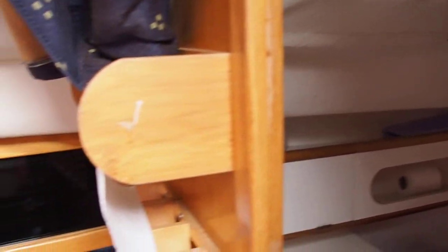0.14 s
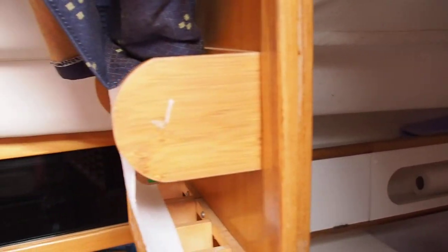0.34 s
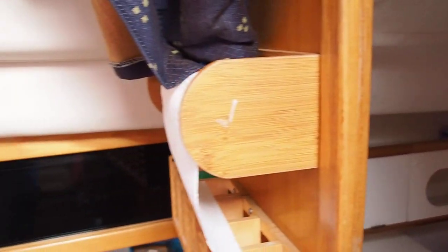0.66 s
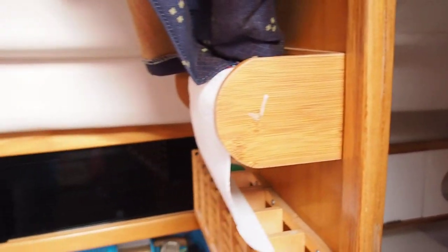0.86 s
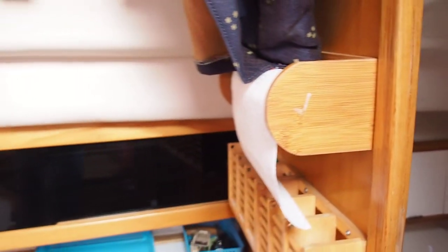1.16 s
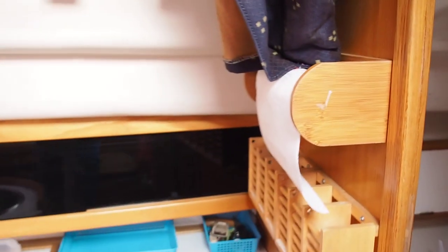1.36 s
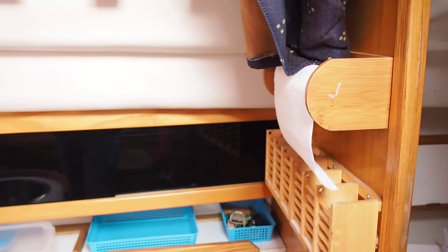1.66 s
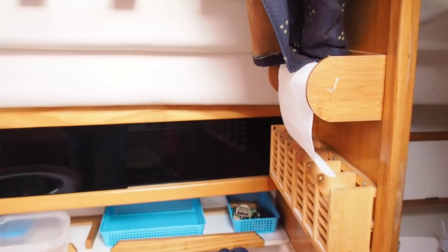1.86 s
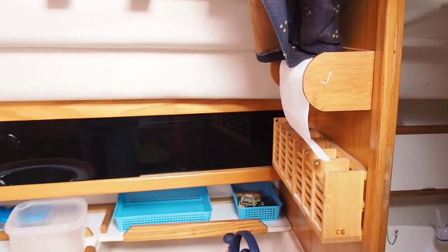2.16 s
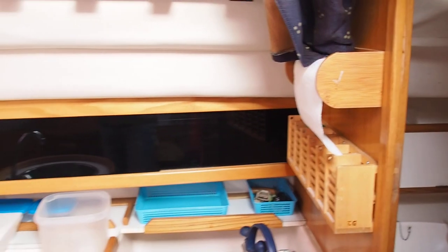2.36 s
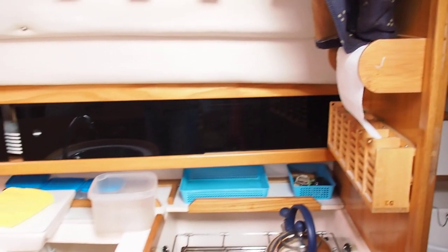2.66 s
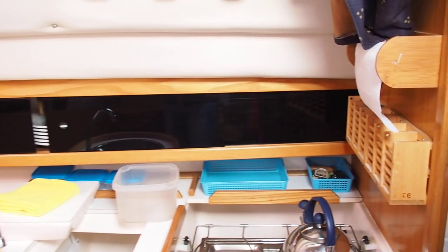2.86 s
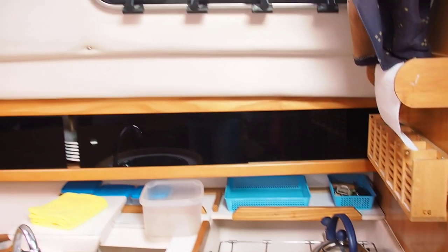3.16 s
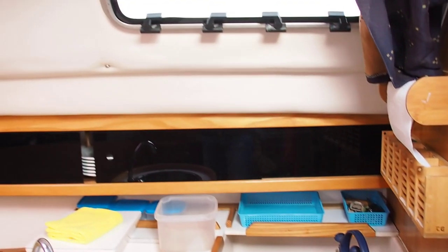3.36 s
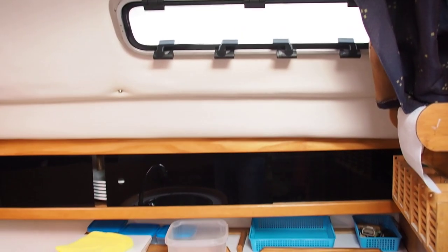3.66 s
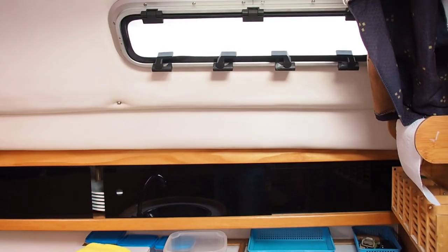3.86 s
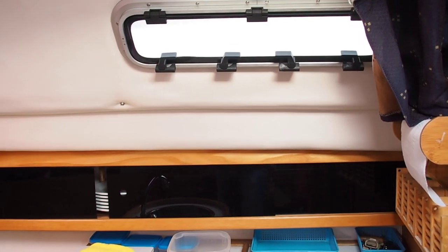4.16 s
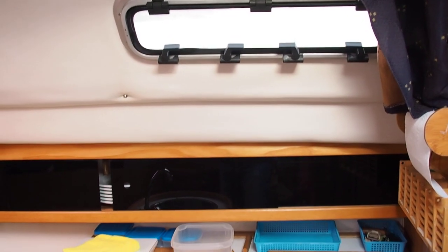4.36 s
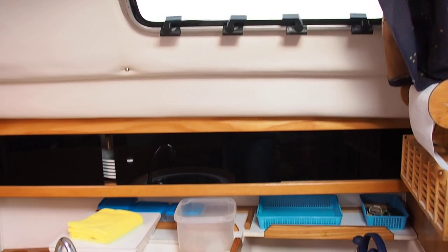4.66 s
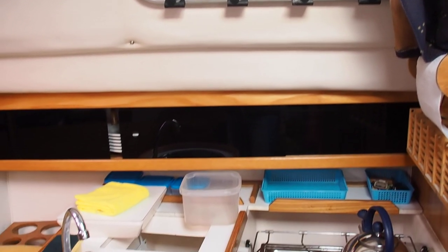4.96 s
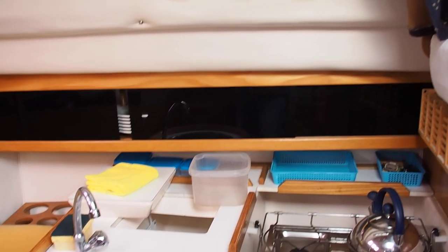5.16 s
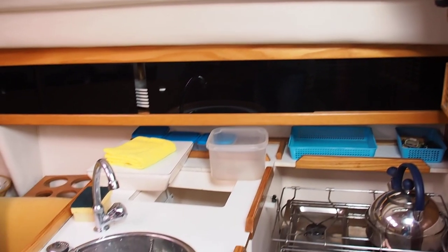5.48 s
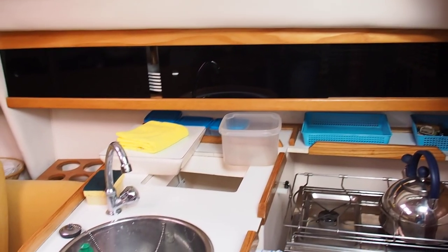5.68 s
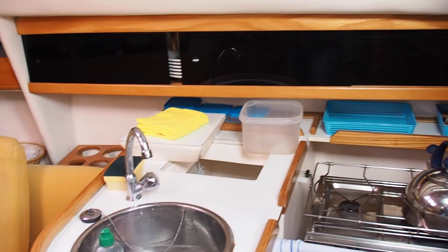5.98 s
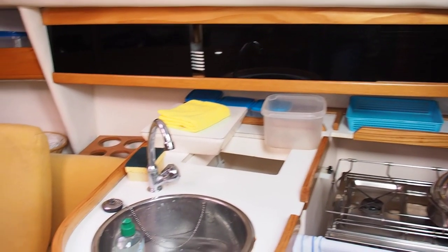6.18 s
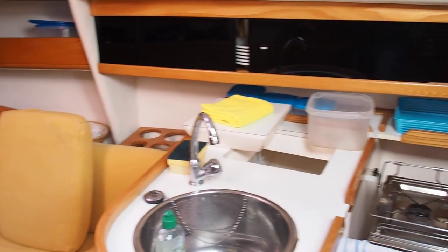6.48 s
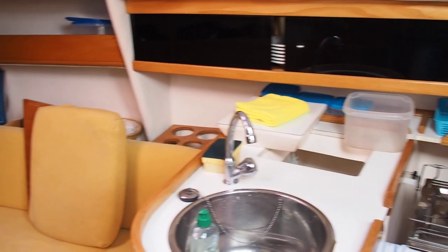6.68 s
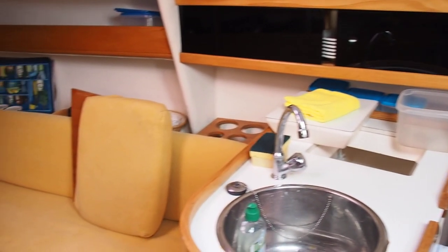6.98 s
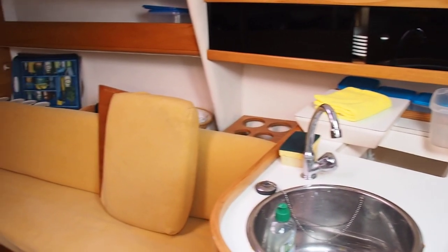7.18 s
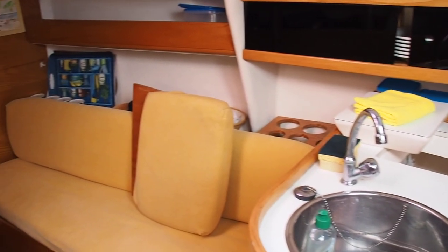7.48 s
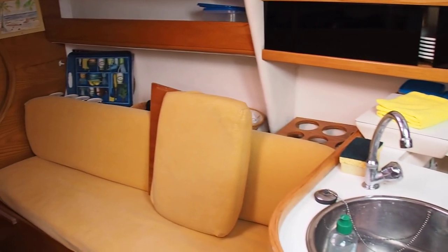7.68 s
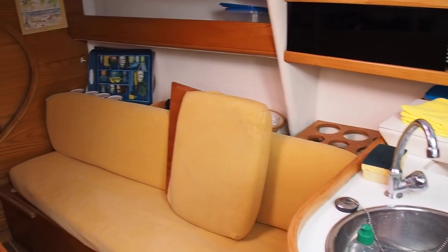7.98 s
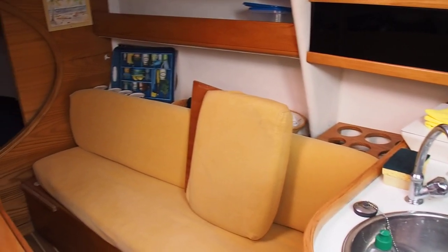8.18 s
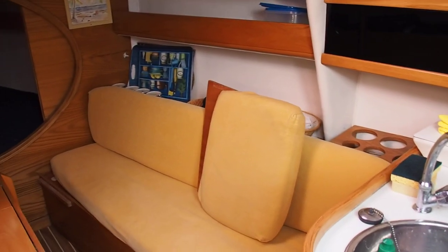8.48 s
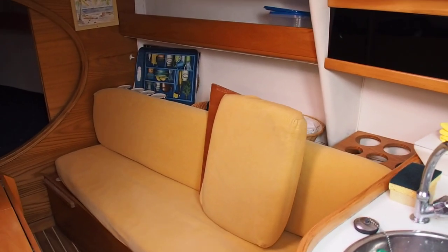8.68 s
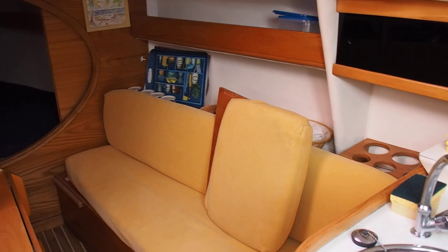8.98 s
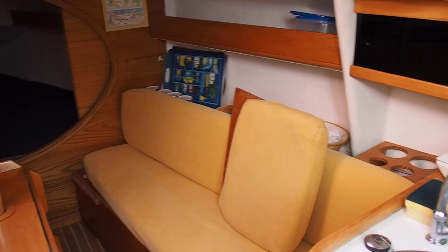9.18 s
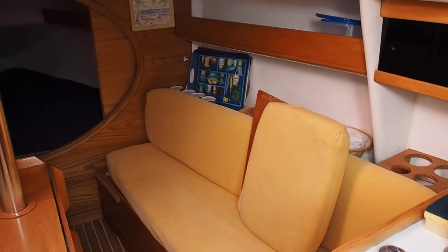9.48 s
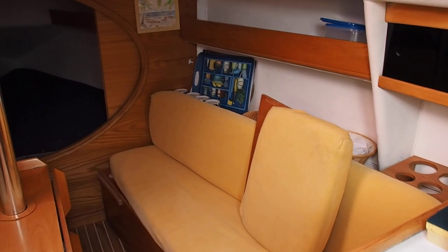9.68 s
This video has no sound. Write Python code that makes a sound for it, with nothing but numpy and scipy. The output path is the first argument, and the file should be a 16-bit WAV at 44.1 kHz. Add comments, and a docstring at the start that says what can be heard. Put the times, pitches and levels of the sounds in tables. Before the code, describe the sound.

A low engine drone carries through a sailboat's hull while cabin woodwork clacks, clicks and thuds a few times.

```python
"""Two distant motors drone through the hull of a small wooden sailboat, heard from inside the cabin.
Each hums at the harmonics of its drifting shaft speed. In the cabin someone shifts about: the woodwork
clacks, clicks and thuds, fittings tick and clothing swishes faintly. Behind it all lie a low rumble and
a soft rush of air. The hand-held stereo microphone pans slowly, coming out from behind a bulkhead,
passing a corner of the galley and turning toward the settee."""
import sys
import numpy as np
from scipy import signal
from scipy.fft import rfft, irfft, next_fast_len
from scipy.io import wavfile

SR = 44100
rng = np.random.default_rng(int(sys.argv[2]) if len(sys.argv) > 2 else 0)


def transcribe(u):
    """Save the signal u as a 16-bit wav file named by the first command-line argument.

    u: samples, shape (n,) or (channels, n), limited to [-1, 1]; the rate is SR.
    q: integer samples, one column per channel.
    """
    v = np.clip(np.atleast_2d(u).T, -1, 1)
    q = np.round(v * 32767).astype(np.int16)
    wavfile.write(sys.argv[1], SR, q)


N = 433944
TURN_S = 6.9  # the microphone turns toward the settee


def motor(shaft_hz, harmonics, drift, throb_db=2.5):
    """Harmonics of a shaft whose speed drifts; each swells and fades on its way through the hull."""
    turns = np.cumsum(shaft_hz * (1 + drift * wander(1.5))) / SR
    hum = np.zeros(N)
    for multiple, db in harmonics:
        throb = gain_of(db + throb_db * wander(2.8))
        hum += throb * np.cos(2 * np.pi * (round(multiple) * turns + rng.random()))
    return evened(hum)


# the fast motor, distant, through the hull: (shaft multiple, relative level [dB])
FAST_HARMONICS = [(1, -17), (2, 6), (3, -34), (4, -17.5)]
# its strength along the microphone's path: (time [s], level [dB])
FAST_LEVEL = [(0.6, -53.5), (1.8, -38), (2.3, -44.5), (3.3, -36), (3.7, -42), (4.4, -43.5), (6.4, -46.5),
              (8, -43), (9.84, -45.5)]


def fast_motor(trim_db=1.0):
    """The higher drone, rising and falling as the microphone moves through the cabin."""
    return gain_of(trim_db) * level(FAST_LEVEL) * motor(55.87, FAST_HARMONICS, drift=0.00598)


# the slow motor, distant, through the hull: (shaft multiple, relative level [dB])
SLOW_HARMONICS = [(1, -12), (2, 1.5), (3, -14), (4, -11.5), (5, -25)]


def slow_motor(db=-44, fade_db_per_s=3):
    """The lower drone: fullest by the galley corner, fading as the microphone turns to the settee."""
    turned_away = gain_of(-fade_db_per_s * np.maximum(np.arange(N) / SR - TURN_S, 0))
    gain = gain_of(db) * mic_path(shadow_db=-2, corner_db=4) * turned_away
    return gain * motor(47.25, SLOW_HARMONICS, drift=0.00597)


# faint tones over the drone, centred between the channels: (frequency [Hz], level [dB])
WHINE_TONES = [(450, -63.5), (601, -64)]


def whines(drift=0.00201):
    """Thin, steady tones that waver slightly in pitch."""
    tones = np.zeros(N)
    for hz, db in WHINE_TONES:
        cycles = np.cumsum(hz * (1 + drift * wander(0.68))) / SR
        tones += gain_of(db) * evened(np.sin(2 * np.pi * cycles))
    return tones


# woodwork in the cabin: a light first contact and then a loud clack, a soft bump, a sharp click, two floor
# bumps, a rattling thud. Crack, thump and note are relative to the level: (time [s], level [dB], brightness
# [Hz], crack [dB], thump [dB], note [Hz], note [dB], ring length [factor])
BLOWS = [(0.4507, -23, 10000, -1, -28, 1100, 1, 0.87), (0.4529, -12.5, 11000, 3, -32, 509, -6, 0.96),
         (0.4784, -23, 5000, -16, -18, 238, -8, 0.68), (0.921, -49, 12000, -8, 12.5, 70.5, 15, 1.3),
         (0.965, -40, 10000, -11, -4, 3750, -18, 1), (2.2990, -25, 9000, -11, -20, 1050, -1.5, 1.02),
         (2.3009, -29.5, 14000, 5, -10, 1430, -3, 0.76), (3.151, -37.5, 300, -35, 5, 98.3, 15.5, 1.3),
         (3.314, -50, 300, -30, -8, 105, 21, 2.5), (5.5936, -18, 500, -35, -9, 446, -1, 0.57),
         (5.5996, -17, 950, -27, -11, 280, -4.5, 0.76), (5.608, -22.5, 500, -17, -1.5, 98, 1.5, 1),
         (5.614, -31, 500, -22, -5, 240, -2, 1.15)]
# the first snap of contact: (frequency [Hz], density [dB])
CRACK_SPECTRUM = [(150, -17), (700, -23), (1600, -20), (4000, 11), (8000, 11), (13000, 6), (16000, -22)]
# the boards underfoot: (frequency [Hz], level [dB], t60 [s])
FLOOR_MODES = [(95, 0, 0.19), (112, -8, 0.12), (153, -4, 0.25), (175, 4, 0.14), (211, -7, 0.23),
               (258, 3.5, 0.41), (323, -3.5, 0.32)]


def knock(db, bright_hz, crack_db, thump_db, note_hz, note_db, length, crack_s=0.00071, note_t60=0.1):
    """A blow on wood: a snap of contact, ringing panels, the struck piece's note and a floor thump."""
    t = np.arange(16384) / SR
    body = woodwork_ring(t, length)
    # a softer contact lasts longer and so loses its treble
    pole = np.exp(-2 * np.pi * bright_hz / SR)
    body = signal.lfilter([(1 - pole) ** 2], np.poly([pole, pole]), body)
    # a small, high-pitched piece cannot drive the bass of the panels
    bass_cut_hz = min(0.72 * note_hz, SR / 4)
    body = signal.lfilter(*signal.butter(1, bass_cut_hz, "high", fs=SR), body)
    snap = (t / crack_s) * np.exp(1 - t / crack_s)
    crack = gain_of(crack_db) * noise(CRACK_SPECTRUM, len(t)) * snap
    note = gain_of(note_db) * ring([(note_hz, 0, note_t60 * length)], t)
    thump = gain_of(thump_db) * ring(FLOOR_MODES, t) * (1 - np.exp(-t / 0.0057))  # 5.7 ms rise
    return gain_of(db) * (crack + body + note + thump)


# the wooden panels around the microphone: (frequency [Hz], level [dB])
PANEL_MODES = [(510, -3.5), (615, -2), (672, -0.5), (810, -8), (985, -10), (1136, -3.5), (1201, -5.5),
               (1310, -10.5), (1475, -4.5), (1814, -8.5), (1950, -3.5), (2290, -20), (2713, -19),
               (2860, -3), (3320, -16), (3833, -6)]
# dense reflections off the close cabin walls: (frequency [Hz], density [dB])
REFLECTION_SPECTRUM = [(60, -36), (150, -6.5), (330, -12.5), (490, 2.5), (760, -3.5), (1100, -3.5),
                       (1650, -15.5), (2000, -12), (2900, -9), (5000, -11.5), (8000, -18.5), (13000, -17),
                       (16000, -30)]
# decay of both, before a blow's ring length scales it: (frequency [Hz], t60 [s])
CABIN_DECAY = [(150, 0.49), (500, 0.17), (2000, 0.17), (5000, 0.16), (9000, 0.18), (15000, 0.15)]


def woodwork_ring(t, length, panels_db=-3, reflections_db=3.5, rise_s=0.00043):
    """Panel modes and a short tail of reflections, dying as fast as the cabin does at each pitch."""
    hz, frame_s, frames = signal.stft(noise(REFLECTION_SPECTRUM, len(t)), SR, nperseg=256)
    fade = np.exp(-np.log(1000) * frame_s / (length * read(CABIN_DECAY, hz)[:, None]))
    tail = signal.istft(frames * fade, SR, nperseg=256)[1][:, :len(t)]
    panels = ring([(f, db, length * read(CABIN_DECAY, f)) for f, db in PANEL_MODES], t)
    return (gain_of(panels_db) * panels + gain_of(reflections_db) * tail) * (1 - np.exp(-t / rise_s))


# ticks and creaks of the cabin fittings: (time [s], level [dB], centre [Hz], width [octaves], t60 [s])
SLIPS = [(0.345, -51, 9000, .6, .06), (1.9047, -47, 4500, 0.91, .04), (2.008, -53, 7000, 1, .06),
         (2.2085, -49, 10000, .5, .07), (2.3006, -24, 13000, 0.14, .02), (2.311, -38, 12800, .15, .05),
         (3.079, -48, 11000, .8, .012), (3.675, -39.5, 1500, .08, 0.16), (5.068, -46, 9000, 1.0, .012),
         (5.1102, -37, 1500, 0.78, 0.14), (5.155, -47, 2800, .8, .1), (5.189, -36, 1500, 0.61, .08),
         (5.2388, -39.5, 1400, 0.7, .2), (5.374, -45, 10400, .15, .018), (5.598, -35.5, 5370, 0.81, 0.14)]


def tick(db, centre_hz, octaves, t60):
    """A tiny slip in a fitting: one band of noise that dies quickly."""
    t = np.arange(SR // 4) / SR
    white = rng.standard_normal((2, len(t)))
    band = tinted(white, lambda hz: np.exp(-(np.log2((hz + 1) / centre_hz) / octaves) ** 2 / 2))
    return gain_of(db) * evened(band) * np.exp(-np.log(1000) * t / t60)


# clothing, faint at the microphone: (frequency [Hz], density [dB])
CLOTH_SPECTRUM = [(2500, -23), (5500, 0.5), (7200, -4), (8300, 0.5), (9800, -3), (12500, -6), (14000, -10),
                  (16000, -34)]
# its strokes: (peak time [s], level [dB] follows the rise time), that is
# (peak time [s], rise time [s], level [dB], relative fizz level [dB])
STROKES = [(0.1, 0.48, -64, -3), (0.7, 0.081, -58, -3), (0.95, 0.081, -60, -1), (1.62, .15, -66, 1),
           (3.55, 0.13, -59, -5.5), (4.797, .19, -57, -8), (6.012, 0.08, -48.5, -4.5),
           (6.19, .11, -58.5, -2), (6.37, .08, -67, 5), (6.627, .22, -58.5, -2)]


def clothing(catches_per_s=60, catch_db=-10, grain_db=0.9, fall_ratio=1.23, taper=1.3):
    """Fabric slides on fabric: grainy swishes with catching fibres and a finer fizz above."""
    swish, fizz = split(noise(CLOTH_SPECTRUM), edge_hz=10000)
    catches = rng.standard_normal((2, N)) * (rng.random(N) < catches_per_s / SR)
    swish += gain_of(catch_db) * evened(tinted(catches, lambda hz: gain_of(read(CLOTH_SPECTRUM, hz))))
    t = np.arange(N) / SR
    swish_power, fizz_power = np.zeros((2, N))
    for s, rise_s, db, fizz_db in STROKES:
        from_peak = np.maximum(s - t, (t - s) / fall_ratio) / rise_s  # dies more slowly than it builds
        power = (gain_of(db) * np.exp(-np.minimum(from_peak ** taper, 20))) ** 2
        swish_power += power
        fizz_power += power * gain_of(fizz_db) ** 2
    grain = gain_of(grain_db * wander(73.0))
    return (np.sqrt(swish_power) * swish + np.sqrt(fizz_power) * fizz) * grain


# the hull, heard from inside: (frequency [Hz], density [dB])
RUMBLE_SPECTRUM = [(18, -42), (32, -22), (42, -17), (54, -1.5), (74, -7.5), (100, 0.5), (122, 0.5),
                   (130, -3), (150, 0.5), (180, -1.5), (212, -2), (260, -12.5), (320, -18.5), (600, -50)]


def hull_rumble(body_db=-37.5, boom_db=-47):
    """Low noise of the hull; its deepest part depends most on where the microphone is."""
    boom, body = split(noise(RUMBLE_SPECTRUM), edge_hz=81)
    body *= gain_of(body_db) * mic_path(shadow_db=-4.5, corner_db=-1.0)
    boom *= gain_of(boom_db) * mic_path(shadow_db=-11.0, corner_db=5.5)
    return body + boom


# room tone of the cabin: the air's rush, hiss and hollow resonance: (frequency [Hz], density [dB])
RUSH_SPECTRUM = [(200, -26), (340, -9), (410, 0), (480, 2), (560, -6), (670, -1.5), (750, -5.5), (840, -6),
                 (930, -6), (1020, -3), (1130, -4.5), (1250, -11), (1400, -4.5), (1650, -14.5),
                 (2400, -34.5)]
HISS_SPECTRUM = [(1300, -0.5), (1650, -4.5), (1830, 3.5), (2100, 1.5), (2350, -0.5), (2900, 1),
                 (4000, -3.5), (5800, -7.5), (8000, -14), (10000, -15), (12800, -24), (15800, -59)]
HOLLOW_SPECTRUM = [(700, -38), (860, -13), (940, 3.5), (1020, -0.5), (1120, -6), (1300, -52)]
# strength of the airflow, which rush and hiss follow: (time [s], level [dB])
AIRFLOW_LEVEL = [(0, -44.5), (2.5, -45), (3.5, -43.5), (4.6, -44), (5.3, -43.5), (7.3, -44.5), (8.6, -44.5),
                 (9.84, -44)]
# the hollow resonance as the microphone pans: (time [s], level [dB])
RESONANCE_LEVEL = [(0, -73), (2.5, -54), (4.2, -50), (5.4, -52.5), (7.3, -58), (8.3, -52.5), (9.1, -46.5),
                   (9.84, -50)]


def air(low_db=-0.55, bright_db=-6.0, hiss_db=-5.0, hiss_fade_db_per_s=0.214, flutter_db=0.51):
    """Moving air rushes, brighter when stronger, under a slowly fading hiss; the cabin rings hollow."""
    strength = level(AIRFLOW_LEVEL)
    surge = evened(strength)
    rush = standing_waves(noise(RUSH_SPECTRUM), depth_db=2.0, spacing_hz=9)
    low, bright = split(rush, edge_hz=837)
    low *= gain_of(low_db) * mic_path(shadow_db=-1.0)
    bright *= gain_of(bright_db) * mic_path(shadow_db=-4.5) * surge ** 0.3
    hiss = standing_waves(noise(HISS_SPECTRUM), depth_db=2.1, spacing_hz=25.16)
    hiss *= gain_of(hiss_db - hiss_fade_db_per_s * (np.arange(N) / SR - TURN_S))
    hiss *= mic_path(shadow_db=-3.5) * surge ** -0.08  # swells a little less than the rush
    hollow = level(RESONANCE_LEVEL) * noise(HOLLOW_SPECTRUM)
    flutter = gain_of(flutter_db * wander(25.0))
    return (strength * (low + bright) + hollow) * flutter + strength * hiss


def standing_waves(x, depth_db, spacing_hz):
    """Reflections in the small cabin ripple a spectrum with fine peaks and dips."""
    grid = np.arange(0, SR / 2, spacing_hz)
    ripple = rng.standard_normal(SR)[:len(grid)]
    return evened(tinted(x, lambda hz: gain_of(depth_db * np.interp(hz, grid, ripple))))


def mic_path(shadow_db, corner_db=0, emerge_s=1.25, emerge_spread_s=0.52, corner_s=2.8, pass_s=0.91):
    """Gain as the microphone leaves the bulkhead's shadow, then passes the galley corner."""
    t = np.arange(N) / SR
    behind = (1 - np.tanh((t - emerge_s) / emerge_spread_s)) / 2
    near = np.exp(-((t - corner_s) / pass_s) ** 2 / 2)
    return gain_of(shadow_db * behind + corner_db * near)


# likeness of the microphone's two ports: (frequency [Hz], correlation)
PORT_LIKENESS = [(60, .994), (130, .985), (290, .96), (640, .89), (1400, .66), (2000, .3), (2600, .08),
                 (3600, -.08), (6000, .05), (15000, .08)]
# how far the left port leads the right: (frequency [Hz], phase [rad])
LEFT_LEAD = [(60, 0), (700, -.05), (1500, -.5), (15000, -.5)]


def noise(spectrum, size=N):
    """Coloured noise at both ports: alike in the bass, less so in the treble."""
    hz = np.fft.rfftfreq(size, 1 / SR)
    left, other = np.exp(2j * np.pi * rng.random((2, len(hz))))
    same = read(PORT_LIKENESS, hz)
    right = (same * left + np.sqrt(1 - same ** 2) * other) * np.exp(-1j * read(LEFT_LEAD, hz))
    return evened(irfft(np.array([left, right]) * gain_of(read(spectrum, hz)), size))


def ring(modes, t):
    """Dying modes of alternating sign; the higher ones reach the two ports more out of step."""
    hz, db, t60 = np.transpose(modes)[:, :, None]
    amplitude = gain_of(db) / np.sqrt(np.sum(gain_of(db) ** 2) / 2)
    sign = (-1) ** np.arange(len(hz))[:, None]
    fade = amplitude * sign * np.exp(-np.log(1000) * t / t60)
    apart = np.arccos(read(PORT_LIKENESS, hz)) / 2
    return np.array([(fade * np.sin(2 * np.pi * hz * t + side * apart)).sum(0) for side in (-1, 1)])


def gain_of(db):
    """Decibels to amplitude."""
    return 10 ** (np.asarray(db) / 20)


def evened(x):
    """Scales to rms 1."""
    return x / np.sqrt(np.mean(x ** 2) + 1e-20)


def read(points, hz):
    """Reads a curve on a log-frequency axis."""
    f, value = np.transpose(points)
    return np.interp(np.log(hz + 1), np.log(f + 1), value)


def level(rows):
    """Gain over time from (time [s], level [dB])."""
    return gain_of(np.interp(np.arange(N) / SR, *np.transpose(rows)))


def tinted(x, gain):
    """Filters by a gain that is a function of frequency."""
    size = next_fast_len(x.shape[-1] + 4096)
    return irfft(rfft(x, size) * gain(np.fft.rfftfreq(size, 1 / SR)), size)[..., :x.shape[-1]]


def wander(rate_hz):
    """Slow random drift of rms 1."""
    return evened(tinted(rng.standard_normal(N), lambda hz: np.exp(-(hz / rate_hz) ** 2)))


def split(x, edge_hz):
    """The parts below and above an edge, each of rms 1."""
    low = tinted(x, lambda hz: 1 / (1 + (hz / edge_hz) ** 12))
    return evened(low), evened(x - low)


def add(mix, s, sound):
    """Mixes a stereo sound in at time s."""
    part = mix[:, round(s * SR):][:, :sound.shape[1]]
    part += sound[:, :part.shape[1]]


def scene():
    """The cabin at the microphone: drone, rumble, air and clothing, with knocks and ticks on top."""
    drone = slow_motor() + fast_motor() + whines()
    mix = drone + hull_rumble() + air() + clothing()
    for s, *blow in BLOWS:
        add(mix, s, knock(*blow))
    for s, *slip in SLIPS:
        add(mix, s, tick(*slip))
    return mix


# treble dips of the microphone housing: (centre [Hz], width [Hz], gain [dB])
HOUSING_DIPS = [(6575, 293, -9), (10380, 510, -10.5)]


def record(dry, balance_db=0.45, edge_hz=15850):
    """The microphone: two housing dips, a slightly louder right port, clipping and a band limit."""
    def housing(hz):
        """Gain through the housing."""
        return gain_of(sum(db * np.exp(-((hz - f) / width) ** 2 / 2) for f, width, db in HOUSING_DIPS))

    balance = gain_of([[-balance_db], [balance_db]])
    clipped = np.clip(tinted(dry, housing) * balance, -1, 1)
    band_limit = signal.firwin(801, edge_hz, window=("kaiser", 9), fs=SR)
    return signal.oaconvolve(clipped, band_limit[None], "same")


dry = scene()
out = record(dry)
transcribe(out)
```